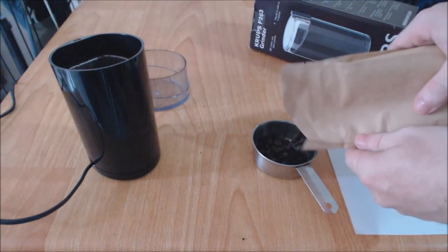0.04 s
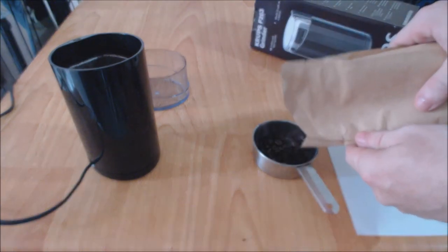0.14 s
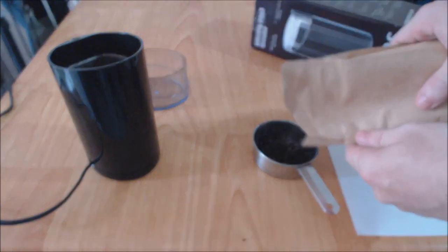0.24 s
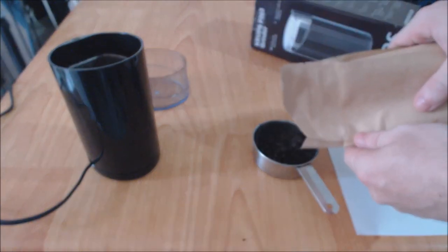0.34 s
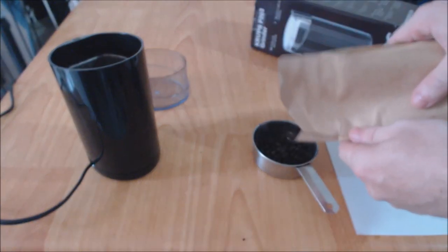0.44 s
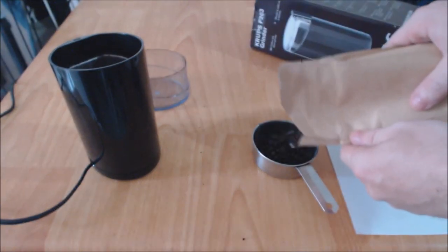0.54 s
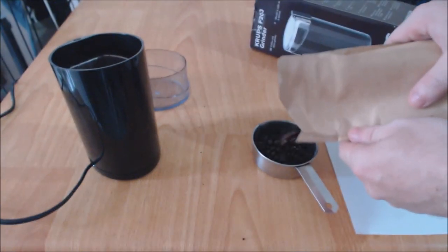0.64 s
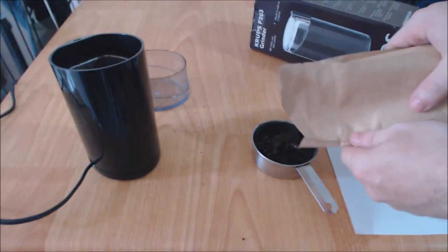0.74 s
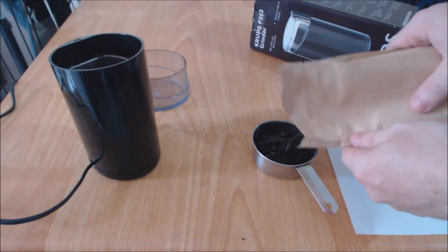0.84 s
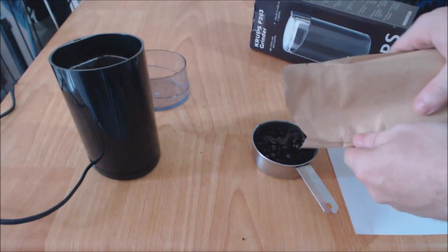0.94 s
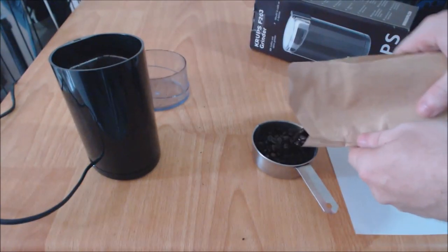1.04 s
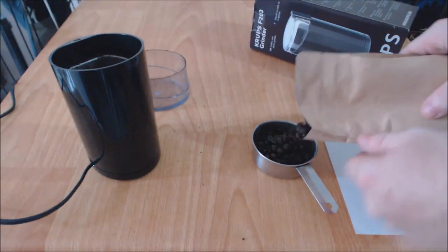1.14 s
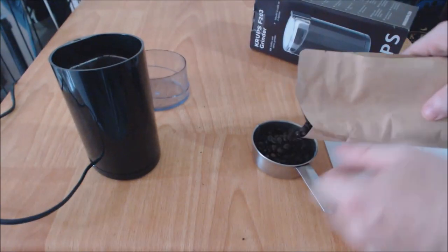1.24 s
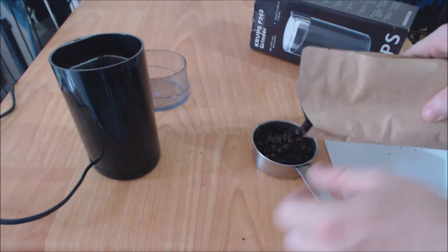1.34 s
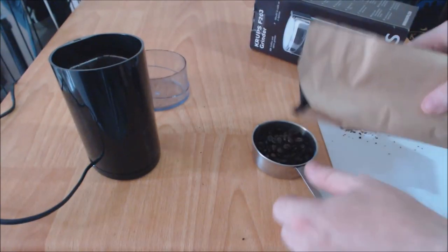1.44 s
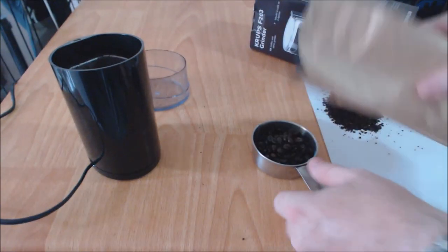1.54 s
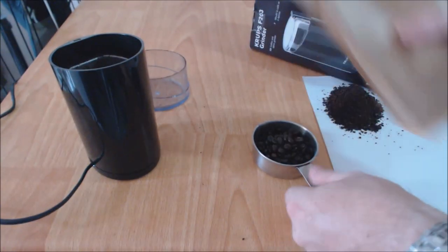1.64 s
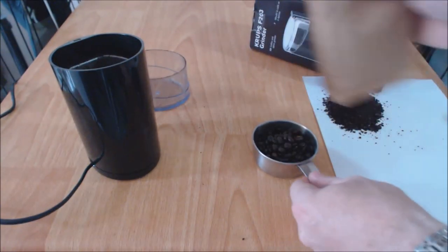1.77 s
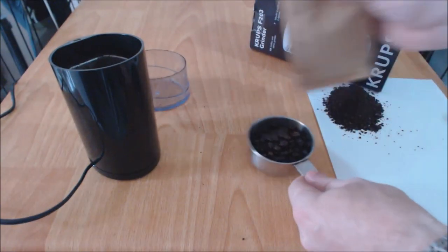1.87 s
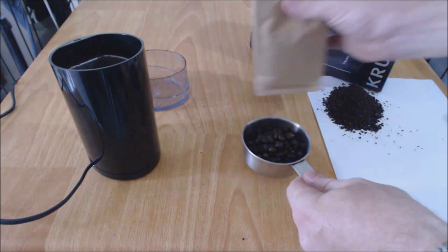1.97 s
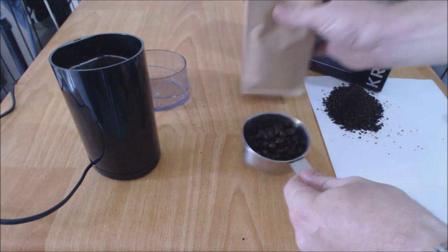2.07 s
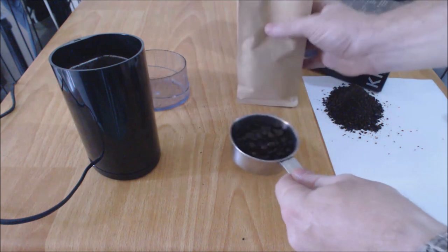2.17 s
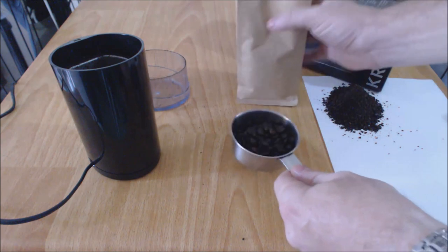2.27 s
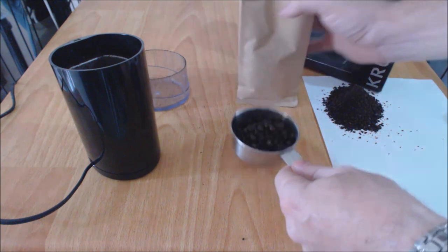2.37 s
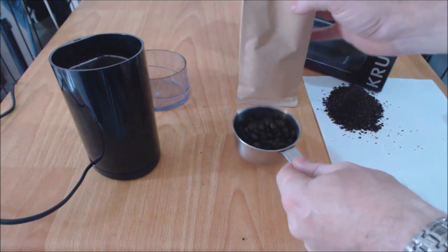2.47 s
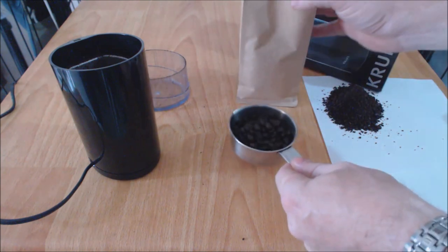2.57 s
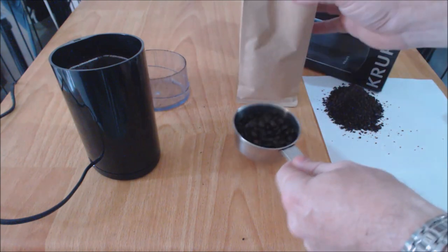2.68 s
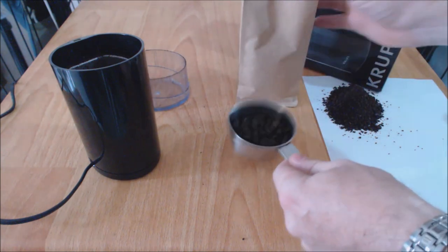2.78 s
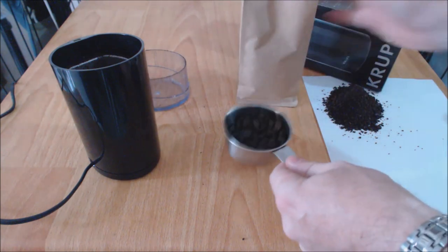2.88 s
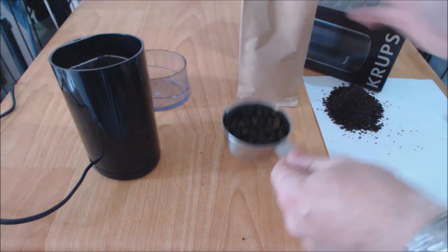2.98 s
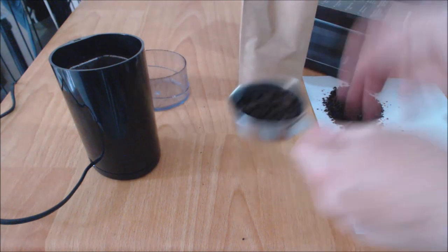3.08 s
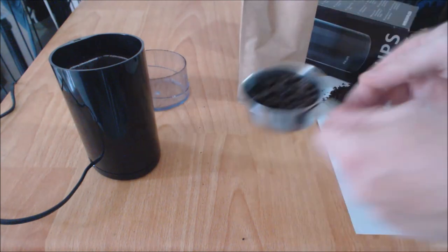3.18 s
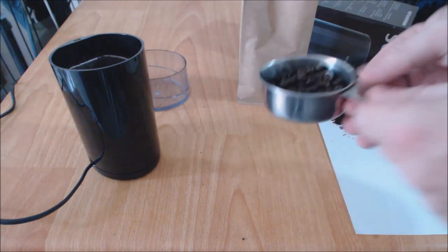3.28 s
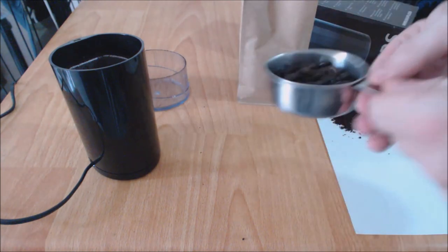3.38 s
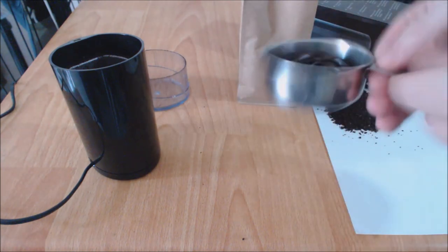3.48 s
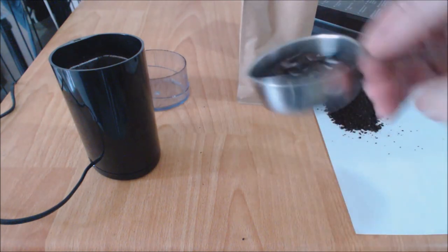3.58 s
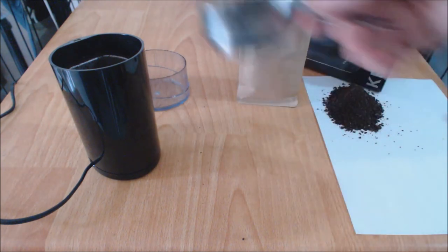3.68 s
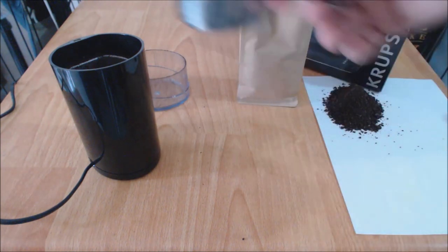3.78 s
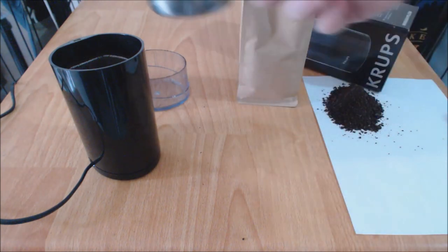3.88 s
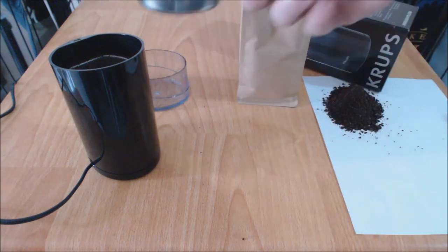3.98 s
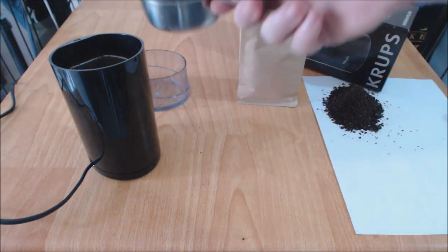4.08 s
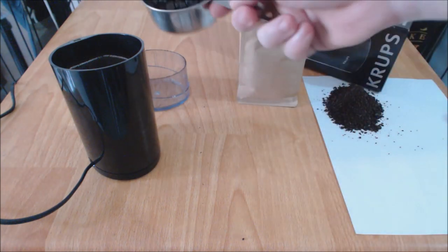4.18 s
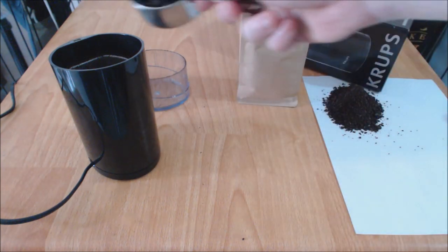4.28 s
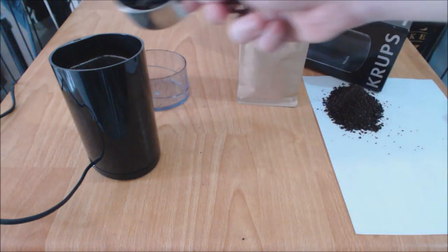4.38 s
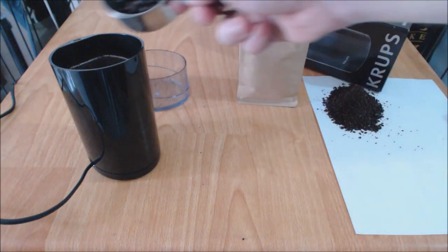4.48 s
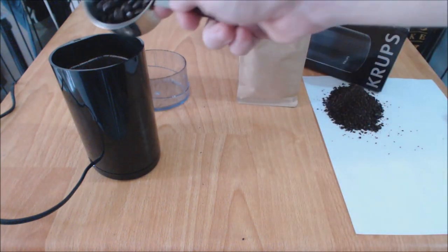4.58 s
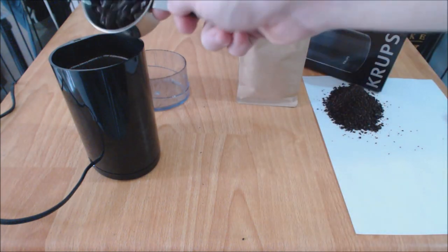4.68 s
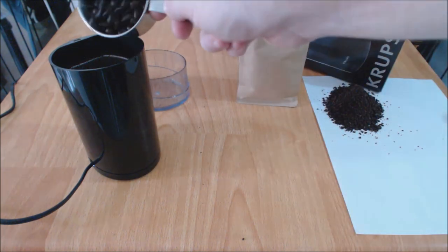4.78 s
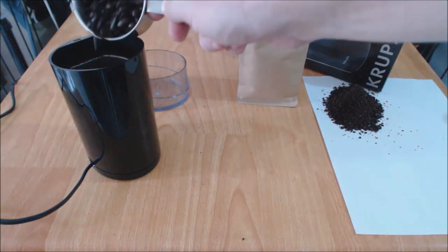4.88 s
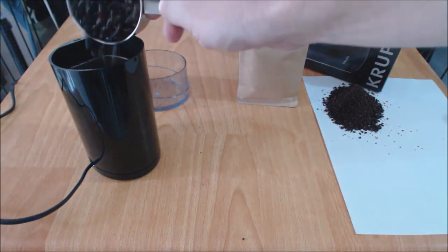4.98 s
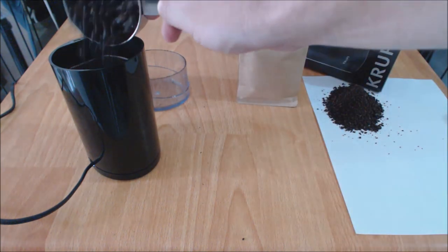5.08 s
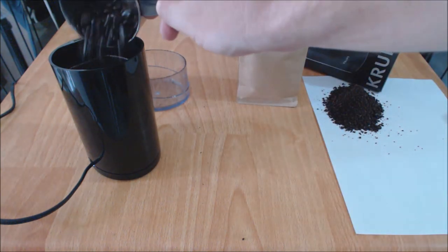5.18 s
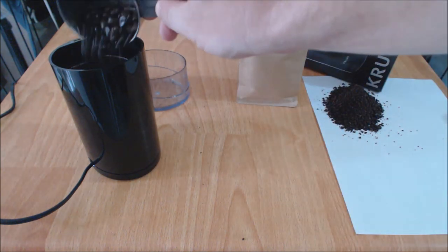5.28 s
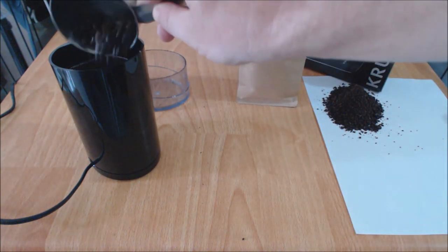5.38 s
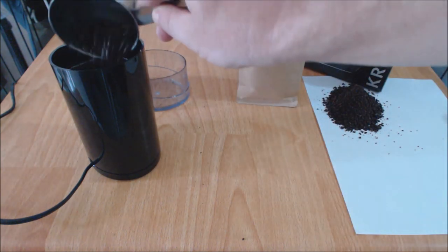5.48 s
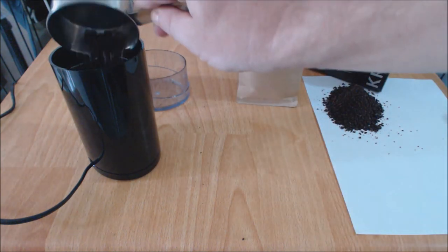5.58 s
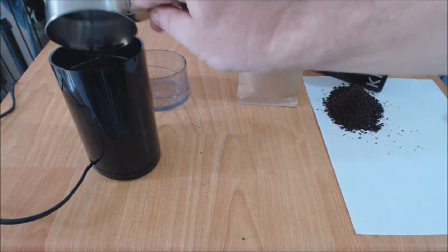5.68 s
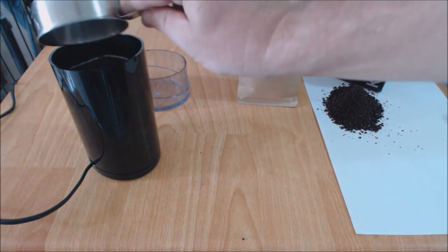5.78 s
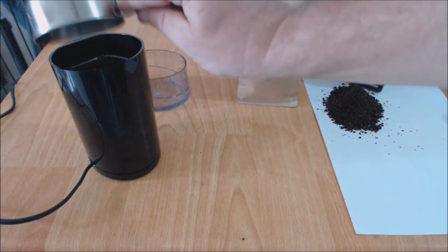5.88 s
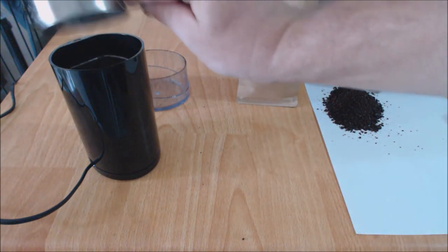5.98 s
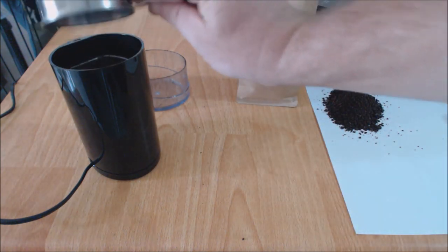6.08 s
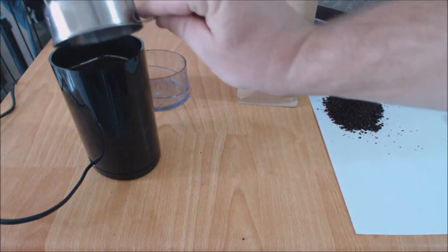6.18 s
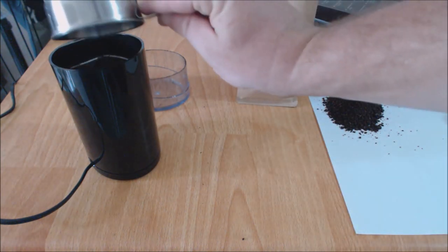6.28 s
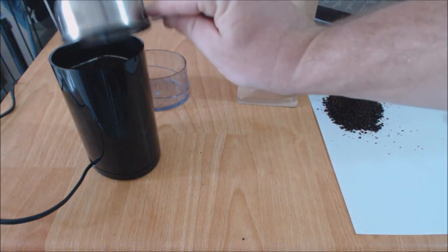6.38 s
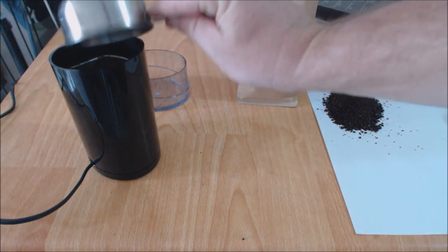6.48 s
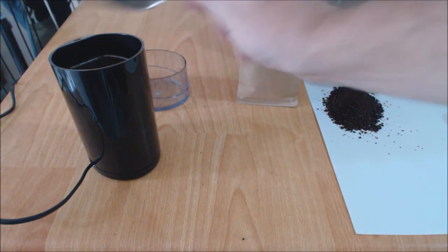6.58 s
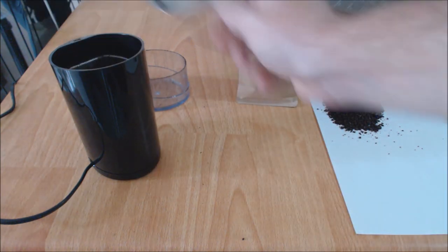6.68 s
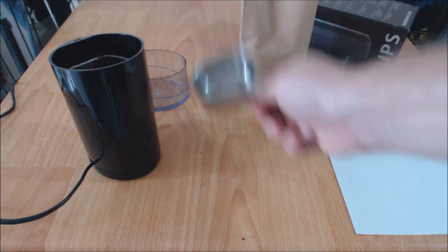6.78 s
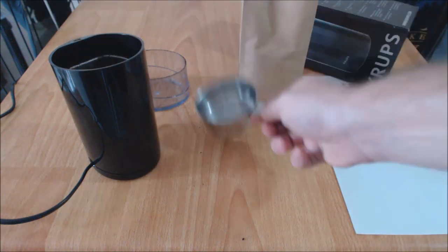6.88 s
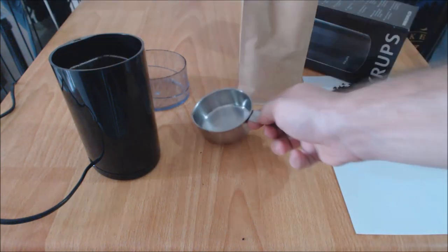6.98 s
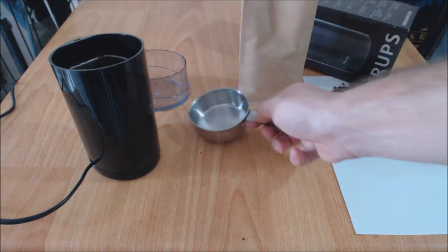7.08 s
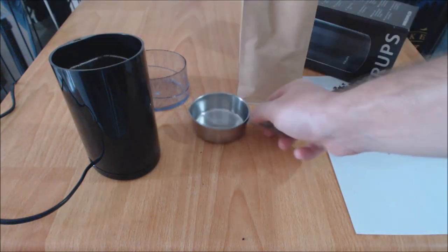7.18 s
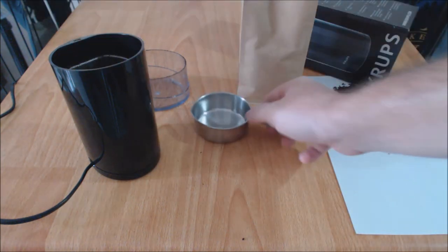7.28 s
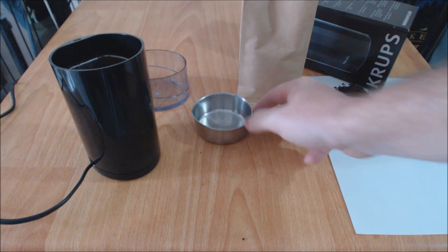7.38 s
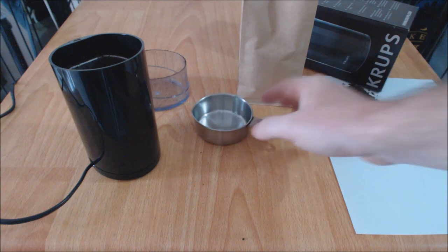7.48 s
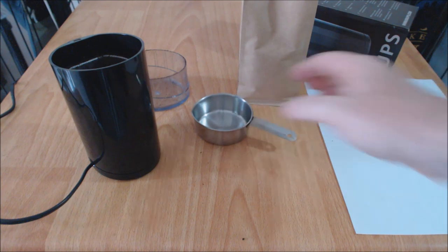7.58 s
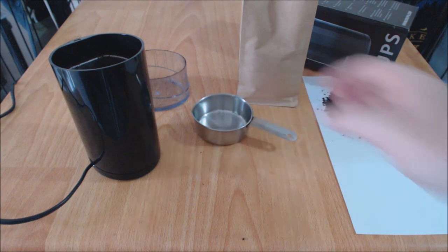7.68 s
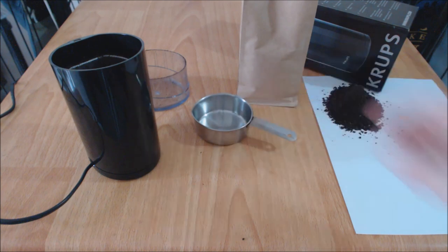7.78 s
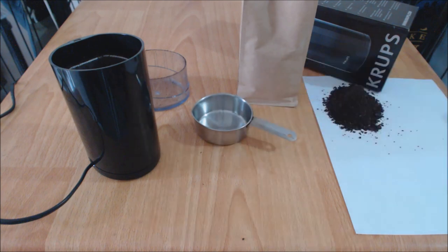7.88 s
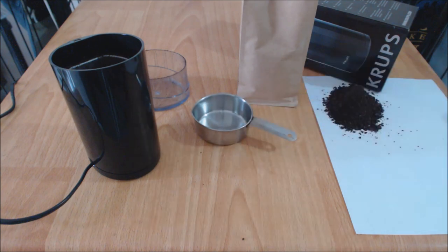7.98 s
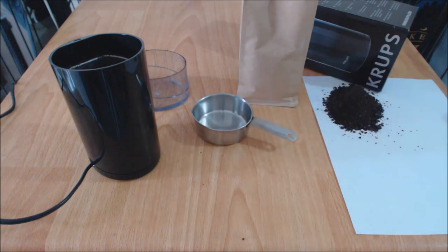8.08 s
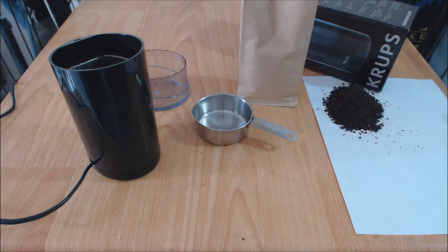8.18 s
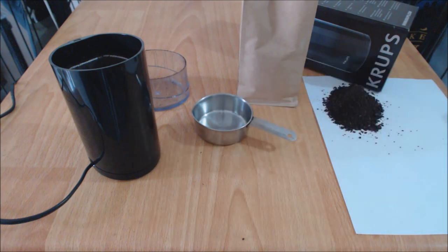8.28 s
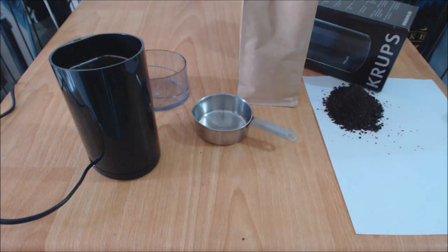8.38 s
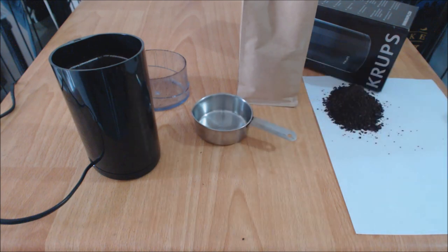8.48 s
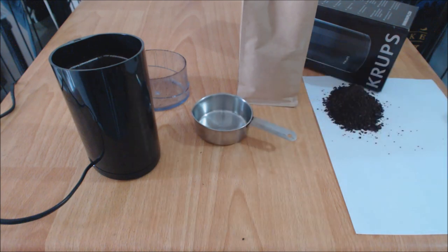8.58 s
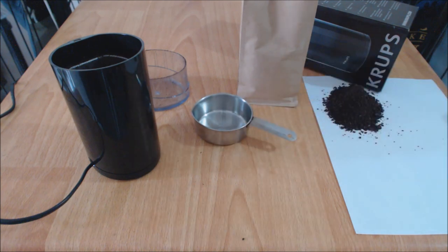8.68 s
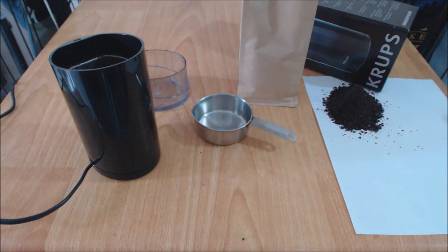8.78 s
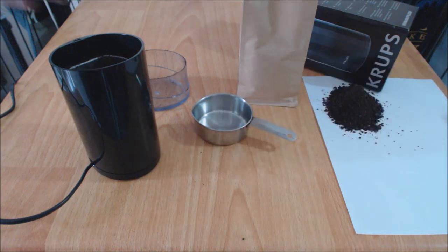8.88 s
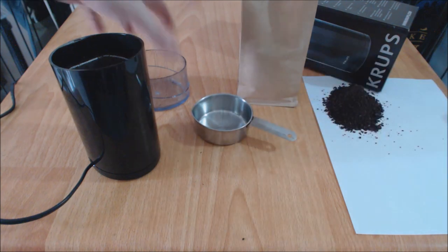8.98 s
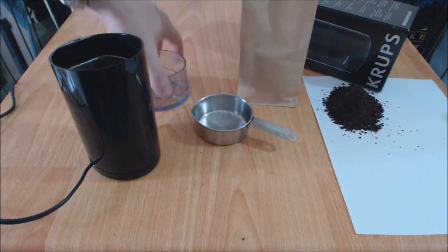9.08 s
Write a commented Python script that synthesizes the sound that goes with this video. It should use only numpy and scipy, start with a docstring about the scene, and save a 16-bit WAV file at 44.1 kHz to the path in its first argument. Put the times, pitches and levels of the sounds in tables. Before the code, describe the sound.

Close up in a small, softly humming room, a few coffee beans click into a steel cup while a paper bag crackles. The bag knocks down on a wooden table and the full cup scrapes across it. Beans are shaken, then poured in a clattering rush into a grinder. The empty cup lands on its edge, then flat with a ringing clank, followed by faint rustles and bumps.

```python
"""Coffee beans trickle from a rustling paper bag into a steel cup on a wooden table, then the bag is set down.
The full cup is dragged and shaken, then emptied into a grinder whose bass dies as it fills.
The cup is put back, landing on its edge, then flat; faint rustles and bumps follow.
Beans and paper are showers of tiny rings, blows are decaying modes, single taps are bursts of resonant noise.
A small room hums and crickets sing throughout; the microphone's noise suppressor ducks whatever nears the hum."""
import sys
import numpy as np
from scipy import signal
from scipy.fft import rfft, irfft
from scipy.io import wavfile
from scipy.ndimage import uniform_filter1d

SR = 44100
rng = np.random.default_rng(int(sys.argv[2]) if len(sys.argv) > 2 else 0)


def dump_mix(stems):
    """Bounce the given channels to the path in sys.argv[1] as a 16-bit WAV at rate SR."""
    frames = np.atleast_2d(stems).T  # one column per channel
    limited = np.clip(frames, -1, 1)  # hard clip at full scale
    pcm = np.round(limited * 32767).astype(np.int16)
    wavfile.write(sys.argv[1], SR, pcm)


N = 403074


def amp(db):
    """Gain of a level in dB."""
    return 10 ** (np.asarray(db) / 20)


def rms_one(x):
    """Scaled to rms 1."""
    return x / np.sqrt(np.mean(x ** 2) + 1e-20)


def in_time(rows):
    """Columns of a curve at every sample; silent outside it."""
    s, *columns = np.transpose(rows)
    return [np.interp(np.arange(N) / SR, s, c, left=-120, right=-120) for c in columns]


def at_hz(points, hz):
    """A spectrum read on a log-frequency axis."""
    return np.interp(np.log(hz), np.log(np.array(points)[:, 0]), np.array(points)[:, 1])


def high_pass(x, order, hz):
    """Butterworth low cut."""
    return signal.sosfilt(signal.butter(order, hz, "high", fs=SR, output="sos"), x)


def ring(clicks, hz, t60):
    """A two-pole resonator: a unit click sets a sine of height 1 ringing."""
    r, w = amp(-60 / (t60 * SR)), 2 * np.pi * hz / SR
    return signal.lfilter([0, np.sin(w)], [1, -2 * r * np.cos(w), r * r], clicks + 1e-18)


def coloured(x, *spectra):
    """x filtered through the sum of the spectra (pitch [Hz], level [dB]), along its last axis."""
    hz = np.arange(1, x.shape[-1] // 2 + 2) * SR / x.shape[-1]
    return irfft(rfft(x) * amp(sum(at_hz(p, hz) for p in spectra)), x.shape[-1])


def leaned(stereo, lean):
    """Splits a left-right difference (pitch [Hz], difference [dB]) evenly over the two ports."""
    left, right = stereo
    lean = np.array(lean)
    return np.array([coloured(left, lean * [1, .5]), coloured(right, lean * [1, -.5])])


def swells(rows, rise, fall):
    """Gains of events that swell, hold and fade at set dB per second: of the main sound and of its second colour."""
    t, power = np.arange(N) / SR, np.zeros((2, N))
    for s, hold, db, *other_db in rows:
        near = slice(max(round((s - .3) * SR), 0), round((s + .5) * SR))
        early = np.maximum(s - t[near], 0)
        late = np.maximum(t[near] - s - hold, 0)
        colours_db = np.array([[0], [sum(other_db)]])
        power[:, near] += amp(colours_db + db - rise * early - fall * late) ** 2
    return np.sqrt(power)


CLUMP_DB = 1.5   # spread of the slow drift in contact strength


def chance_clicks(per_s, uneven_db):
    """Random contacts of either sign, their sizes uneven and drifting in clumps."""
    sizes = amp(uneven_db * np.minimum(rng.exponential(1, N), 4)) * rng.choice([-1, 1], N)
    knots = np.arange(N // 500 + 2)
    clumps = np.interp(np.arange(N) / 500, knots, rng.standard_normal(len(knots)))
    return sizes * amp(CLUMP_DB * clumps) * (rng.random(N) < per_s / SR)


def grains(gains, spectrum, edge_hz, per_s, uneven_db, cycles, body=(), body_db=0., patchy_db=0.):
    """Contacts dealt to short rings of many pitches, and all fed into the resonances of a body.
    The main gain plays above edge_hz and the second below; a negative edge swaps them."""
    heard = np.flatnonzero(gains[0] > 1e-5)
    span, out = slice(heard[0], heard[-1]), np.zeros(N)
    contacts, dealt = chance_clicks(per_s, uneven_db)[span], rng.integers(0, 20, N)[span]
    pitches = np.geomspace(spectrum[1][0], 8000, 20)
    rings = []
    for k, hz in enumerate(pitches):
        level = amp(at_hz(spectrum, hz)) * np.sqrt(hz)   # evenly spaced in octaves, so each covers a width like hz
        rings.append((hz, level * rms_one(ring(contacts * (dealt == k), hz, cycles / hz))))
    scale = np.sqrt(np.sum(amp(2 * at_hz(spectrum, pitches)) * pitches))
    for hz, width, db in body:
        t60 = np.log(1000) / np.pi / width
        rings.append((hz, scale * amp(db + body_db) * rms_one(ring(contacts, hz, t60))))

    knots = np.arange(0, len(contacts) + 1500, 1500)
    main, other = np.zeros(len(contacts)), np.zeros(len(contacts))
    for hz, r in rings:
        # each ring comes and goes on its own
        patches = np.interp(np.arange(len(r)), knots, rng.standard_normal(len(knots)))
        side = main if (hz > abs(edge_hz)) == (edge_hz > 0) else other
        side += r * amp(patchy_db * patches)
    out[span] = gains[0][span] * rms_one(main) + gains[1][span] * rms_one(other)
    return out


TAP_DELAY_S = .0015   # added to every tap's listed time


def taps(rows, width, rise_s, broad_db=0., t60=None):
    """Each a dying burst of noise through a resonance at its pitch, under a shorter broad tick.
    The last column is the t60, or the level of the tick where all share one t60."""
    out, t = np.zeros(N + SR), np.arange(SR // 4) / SR
    crisp = signal.butter(1, [1200, 8000], "band", fs=SR)
    for (s, db, hz, own), noise in zip(rows, rng.standard_normal((len(rows), len(t)))):
        noise = noise + 9.0 * (t < 1.5 / SR)   # the first contact is the hardest
        decay_s = max(t60 or own, .004)
        shape = amp(-60 * t / decay_s) * (1 - np.exp(-(t + 1 / SR) / rise_s))
        tone = shape * ring(noise, hz, 2.5 / (width * hz))
        tick = amp(-100 * t / decay_s) * signal.lfilter(*crisp, noise)
        tick_db = broad_db + (own if t60 else 0)
        burst = tone / np.abs(tone).max() + amp(tick_db) * tick / np.abs(tick).max()
        out[round((s + TAP_DELAY_S) * SR):][:len(t)] += amp(db) * burst / np.abs(burst).max()
    return out[:N]


# spectrum of the room noise: (pitch [Hz], level [dB per Hz]), and its overall level [dB]
AIR_SPECTRUM, AIR_DB = [(30, -7), (52, -1), (84, -12), (123, -9), (355, -5.5), (419, -6.5), (809, -8),
                        (1120, -11.5), (1840, -16.5), (3240, -24), (7050, -31), (8310, -51.5)], -56.5
# lines of the motor hum: (pitch [Hz], level [dB])
HUM_LINES = [(118, -65), (174, -61), (813, -65.5), (910, -68), (1060, -74), (2035, -73.5)]
# crickets: (pitch [Hz], level before chirping [dB], chirp rate [per s], start of one chirp [s])
CRICKET_SONGS = [(7040, -79, 15.4, 8.419), (4595, -81, 3.1, 6.2)]
# stereo lean of the room air: (pitch [Hz], left-right [dB])
AIR_LEAN = [(60, 7.5), (140, 1), (300, 0), (690, -3.5), (1550, -0.5), (3490, 0.5), (7860, 1.5)]


def air():
    """Steady noise, a little different at each port, with wavering motor hum and far crickets from resonant noise."""
    mid, side = rng.standard_normal((2, N))
    tones = sum(amp(db) * rms_one(ring(mid[::-1], hz, 0.35)) for hz, db in HUM_LINES)
    t = np.arange(N) / SR
    for hz, db, per_s, start in CRICKET_SONGS:
        chirps = np.maximum(np.sin(2 * np.pi * per_s * (t - start)), 0)
        tones += amp(db) * rms_one(ring(side[::-1], hz, .2)) * chirps
    ports = np.array([mid + 0.072 * side, mid - 0.36 * side])
    noise = amp(AIR_DB) * rms_one(coloured(ports, AIR_SPECTRUM))
    return leaned(noise + tones, AIR_LEAN)


ROOM_T60_S, WALL_CUT_HZ = 0.29, 3700


def room(x):
    """A dying cloud of echoes, dulled by the walls and mostly shared by the two ports."""
    t = np.arange(round(.6 * SR)) / SR
    mid, side = rng.standard_normal((2, len(t))) * amp(-60 * t / ROOM_T60_S) * (t > .003)
    wall = [1, -np.exp(-2 * np.pi * WALL_CUT_HZ / SR)]   # one-pole treble loss
    echoes = signal.lfilter([1], wall, [mid + .25 * side, mid - .25 * side])
    return signal.fftconvolve(x[None], echoes / np.sqrt(np.sum(echoes[0] ** 2)), axes=1)[:, :N]


# the table top leant on: (start of hold [s], hold [s], level [dB])
LEANT_ON = [(1.34, 0.059, -35), (2.05, 0.046, -39.5), (5.74, 0.017, -52.5), (5.805, 0.0045, -51.5),
            (5.868, 0.0037, -39.5)]
THRUM_HZ, THRUM_RISE_DB_PER_S, THRUM_FALL_DB_PER_S = 146, 341, 362


def thrum():
    """The lowest mode of the table top, a sine that swells softly when it is leant on."""
    gain = swells(LEANT_ON, THRUM_RISE_DB_PER_S, THRUM_FALL_DB_PER_S)[0]
    return gain * np.sqrt(2) * np.sin(2 * np.pi * THRUM_HZ * np.arange(N) / SR)


# crisp paper snaps, knocks on the table, and catches of the cup dragged over the wood:
# (time [s], peak [dB], pitch [Hz], t60 [s])
SNAPS_AND_CATCHES = [(0.1085, -19, 1211, 0.0054), (0.825, -21, 2740, 0.04), (0.89, -23, 784, 0.067),
                     (0.951, -25, 940, 0.18), (1.062, -24, 1390, 0.11), (1.11, -26.5, 1514, 0.21),
                     (1.174, -26.5, 805, 0.037), (1.279, -18.5, 804.7, 0.075), (1.323, -23, 700, 0.018),
                     (1.868, -22.5, 1200, 0.18), (1.868, -25.5, 2550, 0.22), (2.195, -28, 1161, 0.023),
                     (2.257, -27, 2270, 0.026), (2.288, -20.5, 2726, 0.043), (2.344, -30.5, 2690, 0.025),
                     (2.389, -28, 2257, 0.03), (2.39, -35.5, 700, .12), (2.477, -34, 2788, 0.019),
                     (2.502, -22.5, 2707, 0.034), (2.511, -16.5, 2680, 0.024), (2.521, -18.5, 2090, 0.024),
                     (2.577, -14, 2360, 0.016), (2.606, -21, 1900, 0.033), (2.619, -22, 2216, 0.032),
                     (8.69, -37, 578.6, 0.04)]
# faint dull bumps from further off: (time [s], peak [dB], pitch [Hz], t60 [s])
FAR_BUMPS = [(4.035, -48.5, 386.6, .12), (4.08, -45, 748, 0.087), (4.24, -50, 408, .3),
             (4.33, -42.5, 445, 0.29), (4.35, -50.5, 592, .15), (4.45, -51, 425.4, .25),
             (4.545, -45.5, 247, 0.21), (4.55, -48, 339.6, .15), (4.62, -50, 352.7, .25),
             (4.69, -48, 354, .2), (8.03, -43.5, 387, 0.12), (8.7, -35, 516, 0.079),
             (8.71, -47, 139.4, 0.15), (8.97, -42, 363.4, .12)]
# creases in the bag giving way, each with its own colour: (time [s], peak [dB], pitch [Hz], t60 [s])
BAG_CREASES = [(.3, -41, 1240, 0.055), (.38, -39, 1330, 0.049), (.47, -34, 1160, 0.079),
               (.505, -37, 1206, 0.047), (.625, -39.5, 1230, 0.029), (.71, -39.5, 315, 0.033),
               (.77, -34.5, 3100, 0.11), (.87, -32, 1680, 0.11), (.94, -24, 3250, 0.05),
               (.96, -38, 303, 0.1), (1.01, -32, 1470, 0.081), (1.08, -31.5, 746, 0.078),
               (1.11, -33.5, 3250, 0.085), (1.112, -34.5, 315, 0.11), (1.14, -30.5, 1520, 0.062),
               (1.26, -36.5, 1480, 0.051)]


def snaps():
    """Single bursts of resonant noise: crisp snaps, knocks and catches, slow dull far bumps, softer creases."""
    near = taps(SNAPS_AND_CATCHES, width=0.22, broad_db=-12, rise_s=0.0005)
    far = taps(FAR_BUMPS, width=.06, broad_db=-40, rise_s=.012)
    creases = taps(BAG_CREASES, width=0.074, broad_db=-30.5, rise_s=0.0074)
    return near + far + creases


# the full cup dragged over the wood: (start of hold [s], hold [s], level [dB], bright grit against it [dB])
DRAGS = [(2.185, .01, -42, -15.5), (2.2, .09, -35.5, -12.5), (2.389, 0.016, -41.5, -20),
         (2.476, 0.057, -41.5, -10), (2.523, 0.029, -22, -13), (2.576, 0.047, -24.5, -18.5)]
# spectrum of the grit: (pitch [Hz], level [dB per Hz])
GRIT_SPECTRUM = [(88, -49), (150, -18.5), (425, -16.5), (462, -21.5), (765, 3.5), (1500, -0.5), (2130, 7.5),
                 (4100, -14), (6790, -13.5), (8310, -34.5)]
DRAG_RISE_DB_PER_S, DRAG_FALL_DB_PER_S = 1800, 381


def drag():
    """Grit between steel and wood: a dense shower of short rings, split at 3600 Hz."""
    gains = swells(DRAGS, DRAG_RISE_DB_PER_S, DRAG_FALL_DB_PER_S)
    return grains(gains, GRIT_SPECTRUM, -3600, per_s=7400, uneven_db=2.0, cycles=14.0, patchy_db=-2.5)


# the paper crumples: (start of hold [s], hold [s], level [dB], bright rustle against it [dB])
PAPER_CRUMPLES = [(.012, .1, -38, -20.5), (.765, 0.015, -34.5, -17), (.81, 0.013, -36.5, -30),
                  (.888, 0.016, -36, -35), (.94, 0.027, -33, -4), (1.055, 0.013, -39, -28.5),
                  (1.095, 0.037, -41.5, -12), (1.168, 0.0039, -45.5, -22), (1.28, 0.0054, -44.5, -29.5),
                  (1.32, 0.0098, -52, -21), (7.135, .02, -67, 2.5), (8.232, 0.0061, -56.5, 0),
                  (8.3, 0.054, -66, 3), (8.705, 0.0094, -52.5, 4.5), (8.78, 0.047, -66, 3.5)]
CRUMPLE_RISE_DB_PER_S, CRUMPLE_FALL_DB_PER_S = 497.5, 351.5
# faint rustle while the bag is held: (time [s], level [dB])
BAG_HELD = [(.22, -50.5), (.4, -48.5), (.7, -53), (1.39, -51.5), (1.7, -60)]
HELD_BRIGHT_DB = 0.5   # bright rustle against it
# spectrum of the rustle: (pitch [Hz], level [dB per Hz])
PAPER_SPECTRUM = [(88, -51), (150, -40), (299, -6.5), (478, -20.5), (791, -6), (1580, -7), (2170, -12.5),
                  (3300, -25.5), (7390, -25), (8310, -46)]
# air and walls of the bag: (pitch [Hz], width [Hz], level before body_db [dB])
BAG_RESONANCES = [(340, 65, -11), (820, 130, -3), (1390, 140, -4), (3250, 210, -17.5)]


def paper():
    """Tiny buckles of the paper ring briefly and excite the air and walls of the bag."""
    rustle = swells(PAPER_CRUMPLES, CRUMPLE_RISE_DB_PER_S, CRUMPLE_FALL_DB_PER_S)
    rustle = rustle + amp(in_time(BAG_HELD)[0] + [[0], [HELD_BRIGHT_DB]])
    sound = grains(rustle, PAPER_SPECTRUM, -2200, per_s=9000, uneven_db=3.0, cycles=20.0,
                   body=BAG_RESONANCES, body_db=-1, patchy_db=5.0)
    sound = high_pass(sound, 2, 200)
    # the bag is dull between its resonances
    return sound - .6 * signal.lfilter(*signal.butter(1, [1900, 2900], "band", fs=SR), sound)


BLOW_T = np.arange(SR // 2) / SR   # time within a blow [s]
BLOW_CLICK = np.eye(1, SR // 2)[0]


def waver(per_s, knots):
    """A random curve through a blow, with per_s knots each second."""
    return np.interp(BLOW_T * per_s, np.arange(knots), rng.standard_normal(knots))


# modes of the table top: (pitch [Hz], level [dB], t60 before damping [s])
WOOD_MODES = [(239, -3.5, 0.3), (300.5, -0.5, 0.46), (430, -13.5, 0.57), (560, -12, 0.46),
              (637, -8.5, 0.29), (726, -9.5, 0.34), (808, -7, 0.2), (957, 0, 0.22), (1035, -9, 0.13),
              (1178, 0.5, 0.097), (1264, -6, 0.18), (1358, -11, 0.32), (1475, -10, 0.13), (1590, -13, 0.11),
              (2020, -21.5, 0.15), (2438, -21, 0.33), (2660, -23.5, 0.25)]
BOOM_T60_S, BEAT_DB = 0.092, 6.5


def struck_wood(level_db, boom_db, damping, soft_db, bow_db):
    """The modes of the table top die away over the boom of its lowest one."""
    wood = np.zeros(len(BLOW_T))
    for hz, db, t60 in WOOD_MODES:
        mode_db = level_db + db - soft_db * np.log2(hz / 600) - bow_db * np.log2(hz / 900) ** 2
        beating = amp(BEAT_DB * np.minimum(BLOW_T / .02, 1) * waver(90, 50))   # close modes beat
        wood += amp(mode_db) * ring(BLOW_CLICK, hz, t60 / damping) * beating
    # the wood is cut below 170 Hz
    wood = signal.lfilter(*signal.butter(2, 170, "high", fs=SR), wood)
    return wood + amp(boom_db) * ring(BLOW_CLICK, THRUM_HZ, BOOM_T60_S)


# modes of the empty steel cup, some in close pairs:
# (pitch [Hz], level on the edge [dB], level landing flat [dB], t60 before damping [s])
STEEL_MODES = [(867, -25, 0, .25), (904, 0, -18, .36), (1828, -30, 4, .26), (1857, -13, -25, .67),
               (2121, -30, -6, .22), (3063, -24, -4, .23), (3603, -28, -17, .4), (4624, -32, -14, .3),
               (5356, -45, -11, .47), (5405, -24, -22, .25), (6485, -24, -13, .24), (7500, -15, -17, .24)]
GRIP_S, WOBBLE_DB = 0.003, 4.0   # choking time at 900 Hz; depth of the rocking


def struck_steel(level_db, flat, damping, dull_db, touched):
    """The cup rings by how flat it lands, until the next firm contact chokes its low modes first."""
    steel = np.zeros(len(BLOW_T))
    for hz, edge, full, t60 in STEEL_MODES:
        landing_db = edge + np.clip(flat, 0, 1) * (full - edge)
        mode_db = level_db + landing_db - dull_db * np.log2(hz / 900)
        choke = np.exp(-touched / GRIP_S * (900 / hz) ** 2)
        rocking = amp(WOBBLE_DB * flat * waver(70, 40))
        steel += choke * amp(mode_db) * ring(BLOW_CLICK, hz, t60 / damping) * rocking
    return steel


# spectrum of the crack: (pitch [Hz], level [dB per Hz])
CRACK_SPECTRUM = [(59, -30.5), (100, -18.5), (315, -6), (920, 0.5), (1360, -3.5), (2740, -14), (6780, -23),
                  (8310, -29.5)]


def crack_of_blow(level_db, tail_db, damping):
    """Coloured noise with a click in it: a short burst over a weaker tail that dies with the wood."""
    noise = rng.standard_normal(len(BLOW_T)) + 7.2 * np.roll(BLOW_CLICK, 30)
    shape = amp(-60 * BLOW_T / 0.018) + amp(tail_db - 60 * BLOW_T * damping / 0.47)
    return amp(level_db) * rms_one(coloured(noise, CRACK_SPECTRUM)) * shape / 2


# blows on the table: (time [s], boom [dB], wood [dB], steel [dB], crack before halving [dB],
# flatness of the landing [0-1], damping of the wood [divides t60], its softness [dB per octave],
# damping of the steel [divides t60], its dullness [dB per octave],
# loss away from the wood's middle [dB per octave squared], tail of the crack [dB])
TABLE_BLOWS = [(1.867, -36.5, -31, -61, -2, .5, 1.2, 0, 1.5, 0, 2, -28),
               (5.034, -26, -60, -68, -14.5, 0.05, 1.4, -22, 1.4, -7.5, 13.5, -15.5),
               (6.781, -12, -22, -17, -3, 0, 1.4, 1, 1.3, 17, 3.5, -17),
               (7.369, -44, -19, -16, -16.5, 0.01, 0.9, -1, 0.94, 2.5, 2.5, -15.5),
               (7.49, -68, -69.5, -52, -49.5, 0.5, 1.6, 1.5, 1.4, -8, 0, -16.5),
               (7.526, -10, -17, -13, 6, 1, 1.1, -1, 0.6, 4, 0, -17),
               (7.592, -60, -30, -30, -30, .9, 1.2, -2, .8, 2, 0.5, -12),
               (7.710, -44.5, -18.5, -42, -18.5, .3, 1.6, 0, 2.5, -5, 2.5, -13),
               (7.728, -43, -20, -48, -22, .5, 1.7, 0, 3.0, -5, 1.5, -11),
               (7.741, -30, -21, -46, -23, .5, 1.5, 0, 3.0, -5, 1.5, -10)]


def blows():
    """Each blow rings wood and steel under a short crack."""
    out = np.zeros(N + SR)
    following = TABLE_BLOWS[1:] + [[N / SR, 0, 0]]
    for blow, after in zip(TABLE_BLOWS, following):
        s, boom_db, wood_db, steel_db, crack_db, flat, damping, soft_db, held, dull_db, bow_db, tail_db = blow
        firm = after[2] > -50
        touched = np.maximum(BLOW_T + s - after[0], 0) * firm   # time since the next firm contact
        sound = struck_wood(wood_db, boom_db, damping, soft_db, bow_db)
        sound = sound + struck_steel(steel_db, flat, held, dull_db, touched)
        sound = sound + crack_of_blow(crack_db, tail_db, damping)
        out[round(s * SR):][:len(BLOW_T)] += sound
    return out[:N]


# light ticks on the steel cup: (time [s], level [dB], pitch [Hz], t60 [s])
STEEL_PINGS = [(1.652, -43, 4940, .07), (5.194, -45, 5405, .2), (5.288, -40, 5405, .1),
               (5.465, -36, 5405, .08), (5.505, -37, 5405, .08), (6.132, -44, 3700, .09),
               (6.178, -68, 4665, 1.5), (6.719, -62, 1852, .67), (6.782, -34, 3588, .45)]


def pings():
    """A tick sets one clean mode of the cup ringing."""
    out = np.zeros(N)
    for s, db, hz, t60 in STEEL_PINGS:
        out[round(s * SR):][:SR] += amp(db) * ring(np.eye(1, SR)[0], hz, t60)
    return out


# beans strike the bare floor of the grinder: (start of hold [s], hold [s], level [dB])
FLOOR_LANDINGS = [(5.325, .03, -47.5), (5.435, .015, -48.5), (5.515, 0.055, -41), (5.7, .02, -54)]
HOLLOW_HZ, HOLLOW_T60_S, HOLLOW_SWELL_DB_PER_S = 740, 0.025, 350


def hollow():
    """Random landings excite the air column of the grinder, two resonances in series."""
    once = ring(chance_clicks(per_s=6900, uneven_db=-2.0), HOLLOW_HZ, HOLLOW_T60_S)
    column = rms_one(ring(once, HOLLOW_HZ, HOLLOW_T60_S / 4))
    return swells(FLOOR_LANDINGS, HOLLOW_SWELL_DB_PER_S, HOLLOW_SWELL_DB_PER_S)[0] * column


# beans jolt in the cup, first falling from the bag, then shaken:
# (start of hold [s], hold [s], level [dB], low clatter against it [dB])
CUP_JOLTS = [(0.0, .11, -28, -8.5), (.125, 0.043, -36.5, -8), (.19, 0.0081, -27, -25),
             (.442, .003, -47, -14), (1.652, 0.0073, -54.5, -20), (2.728, 0.0021, -51.5, -2.5),
             (3.008, 0.0035, -54, -14.5), (3.082, 0.0017, -36.5, -13.5), (3.125, 0.023, -33, -11),
             (3.205, 0.058, -33, -11), (3.675, 0.049, -47.5, -13.5), (3.812, 0.0016, -44, -24),
             (3.848, 0.03, -38.5, -7.5), (3.92, 0.022, -51, -14.5), (4.51, 0.0083, -54.5, -12.5)]
JOLT_RISE_DB_PER_S, JOLT_FALL_DB_PER_S = 902, 418
# spectrum of the beans: (pitch [Hz], level [dB per Hz])
BEAN_SPECTRUM = [(290, -59), (500, -24), (712, -9.5), (1070, -32), (1800, 6.5), (2530, -4.5), (3210, -0.5),
                 (7560, -3.5), (8310, -42)]
# resonances of the full cup: (pitch [Hz], width [Hz], level before body_db [dB])
FULL_CUP_RESONANCES = [(2353, 120, -5.5), (2360, 78, -3), (3440, 250, 1), (4620, 14, -17.5), (5520, 87, -1),
                       (6340, 340, -3.5), (7440, 150, -3)]


def jolted_beans():
    """Beans knock on each other and on the cup, whose walls resonate."""
    gains = swells(CUP_JOLTS, JOLT_RISE_DB_PER_S, JOLT_FALL_DB_PER_S)
    return grains(gains, BEAN_SPECTRUM, 2500, per_s=7000, uneven_db=6.0, cycles=13.0,
                  body=FULL_CUP_RESONANCES, body_db=-3.0, patchy_db=3.5)


# flow from the cup into the grinder: (time [s], level [dB], low clatter against it [dB])
POUR_FLOW = [(4.95, -74, -4.5), (5.02, -43.5, -19.5), (5.096, -47, -7.5), (5.29, -42.5, -15.5),
             (5.32, -36, -11), (5.55, -31, -1), (5.65, -28.5, -7), (5.71, -36.5, -3), (5.96, -37.5, -1),
             (6.068, -41, -1), (6.12, -66.5, 4.5)]
# resonances of the grinder: (pitch [Hz], width [Hz], level before body_db [dB])
GRINDER_RESONANCES = [(2046, 250, 4), (3098, 190, 1.5), (3640, 35, -1), (5300, 86, -1.5), (6350, 55, -6),
                      (6940, 62, -10.5)]


def poured_beans():
    """A stream of landings rings the beans and the grinder."""
    flow_db, clatter_db = in_time(POUR_FLOW)
    return grains(amp([flow_db, flow_db + clatter_db]), BEAN_SPECTRUM, 2500, per_s=3500, uneven_db=2.2,
                  cycles=17.0, body=GRINDER_RESONANCES, body_db=-13, patchy_db=2.5)


# single beans that stand out:
# (time [s], peak [dB], pitch [Hz], broad tick against the tone, before broad_db is added [dB])
BEAN_CLICKS = [(0.0407, -9.5, 3470, -3), (0.0576, -22, 3400, 3.5), (0.0842, -19.5, 3500, -0.5),
               (0.091, -21.5, 3500, -1.5), (0.1086, -11, 5470, 0), (0.1375, -20, 3570, -2.5),
               (0.1633, -21.5, 5100, -5.5), (0.1955, -14, 7500, -11), (0.1949, -18.5, 3660, 8),
               (0.2228, -31, 5440, -24), (0.2562, -28.5, 5500, -3), (0.4398, -24, 6130, -3),
               (0.5231, -27, 6440, 2), (1.6516, -31, 5240, -7), (2.7306, -30, 7630, -5.5),
               (2.7501, -34.5, 7340, -6), (2.8309, -39, 5790, -2), (3.1257, -20.5, 7700, -5),
               (3.1468, -23.5, 2040, -5), (3.2195, -21.5, 5520, -2.5), (3.2393, -21, 3140, -2.5),
               (3.2523, -25.5, 3370, -3), (3.2798, -29.5, 3430, -1.5), (3.6325, -44.5, 3550, -6.5),
               (3.7199, -32, 4820, -3), (3.8151, -30, 5420, -3.5), (3.846, -24.5, 5540, -2),
               (3.8587, -25, 5460, -4.5), (3.922, -38, 4870, -4), (4.5028, -43, 3070, 0.5),
               (4.612, -56, 5670, -4.5), (4.9848, -36.5, 3610, 0.5), (5.0254, -16, 1550, 8.5),
               (5.0638, -28, 1590, 1), (5.1305, -30, 3020, -1), (5.1577, -28, 3080, 3),
               (5.217, -27, 3470, -1.5), (5.2628, -26.5, 3640, -4), (5.2778, -27, 3550, -3),
               (5.289, -29, 5300, -3.5), (5.3077, -22, 3470, -5), (5.3203, -30, 3550, -2),
               (5.3327, -15, 4060, 2.5), (5.3466, -20, 3760, -4.5), (5.3755, -8, 1900, 2),
               (5.4129, -6, 2700, 7), (5.4375, -20.5, 3070, -4), (5.4632, -16.5, 5500, -3.5),
               (5.475, -21, 2170, -5.5), (5.4916, -14.5, 3240, -3), (5.5138, -10, 1700, 4.5),
               (5.5198, -9.5, 3600, 0), (5.5378, -19.5, 4020, -11.5), (5.5846, -15, 1780, 5),
               (5.621, -14.5, 1770, 1), (5.6348, -14.5, 6360, -4), (5.6478, -21.5, 1810, -3.5),
               (5.657, -21.5, 1792, -0.5), (5.685, -18.5, 3260, -3), (5.7126, -15.5, 3230, -1),
               (5.7507, -29, 3000, 0), (5.8046, -23.5, 4300, -5), (5.866, -18, 1890, -7.5),
               (5.9273, -18, 1970, -2.5), (5.9707, -21.5, 3800, -1.5), (6.0229, -27, 3680, -4.5),
               (6.0824, -34.5, 3600, -6), (6.1309, -31, 3800, -2.5), (6.1768, -47.5, 4350, -7)]
# the grinder fills: (time [s], share filled [0-1])
GRINDER_FILL = [(5.55, 0), (6.0, 1)]


def beans():
    """Jolted, poured and single beans, too small to radiate bass; the low end dies as the grinder fills."""
    sound = jolted_beans() + poured_beans()
    sound += taps(BEAN_CLICKS, width=0.1, rise_s=0.00045, t60=0.02, broad_db=4.0)
    sound = high_pass(sound, 6, 1150)
    filled = np.interp(np.arange(N) / SR, *np.transpose(GRINDER_FILL))
    thin = signal.sosfiltfilt(signal.butter(4, 1700, "high", fs=SR, output="sos"), sound)
    return sound + filled * (thin - sound)


# where the hands work: (time [s], left-right [dB])
HAND_PAN = [(0.0, -0.5), (.8, -4), (1.5, -1.5), (1.9, -1.5), (4.5, 1), (6.1, -0.5), (6.78, 2), (7.3, 0),
            (9.2, -2)]
# stereo lean of the sounds on the table: (pitch [Hz], left-right [dB])
TABLE_LEAN = [(100, 2), (250, -1), (500, 2.5), (1000, -3), (2500, 1), (5000, 0), (8000, 1.5)]
ROOM_DB = -16.5


def scene():
    """Everything on the table, panned with the hands, in the room."""
    near = beans() + paper() + drag() + snaps() + hollow() + pings() + blows() + thrum()
    bounce = .14 * np.r_[np.zeros(31), near[:-31]]   # an echo off the table, opposite in the two ports
    pan_db = in_time(HAND_PAN)[0] / 2
    ports = [near + bounce, near - bounce] + amp(ROOM_DB) * room(near)
    return leaned(amp([pan_db, -pan_db]) * ports, TABLE_LEAN) + air()


TOP, MIC_LOW_HZ, CUTOFF_HZ = .58, 104, 8700   # ceiling of the rounded peaks; low cut; high stop-band edge
DUCK_DB, DUCK_MARGIN_DB, DUCK_KNEE_DB, DUCK_HOLD_S = -14, 10, 15, 0.0041


def record(dry):
    """Peaks are rounded; the suppressor learns the steady noise and ducks bands near it; both ends are cut."""
    rounded = high_pass(TOP * np.tanh(dry / TOP), 4, MIC_LOW_HZ)
    cells = signal.stft(rounded, nperseg=512, noverlap=384)[2]
    power = np.mean(np.abs(cells) ** 2, axis=0)   # shared by both ports
    steady = np.percentile(uniform_filter1d(power, size=9, axis=1), 30, axis=1, keepdims=True)
    above = uniform_filter1d(power / steady, size=15, axis=0)
    keep = np.exp(-128 / SR / DUCK_HOLD_S)
    held = signal.lfilter([1 - keep], [1, -keep], above)
    above_db = 10 * np.log10(np.maximum(above, held))   # opens at once, closes slowly
    gain = amp(DUCK_DB / 2 * (1 - np.tanh((above_db - DUCK_MARGIN_DB) / DUCK_KNEE_DB)))
    ducked = cells * uniform_filter1d(gain, size=3, axis=1)
    clean = signal.istft(ducked, nperseg=512, noverlap=384)[1][:, :N]
    hiss = amp(-104) * rng.standard_normal(N)
    return signal.sosfilt(signal.cheby2(15, 70, CUTOFF_HZ, fs=SR, output="sos"), clean) + hiss


dry = scene()
out = record(dry)
dump_mix(out)
```